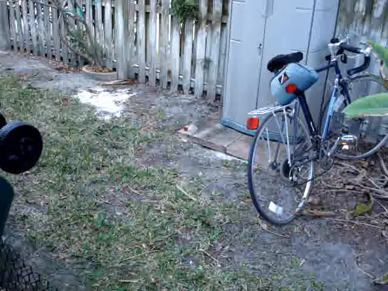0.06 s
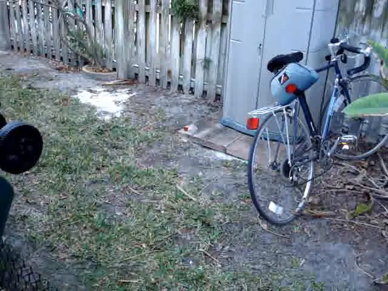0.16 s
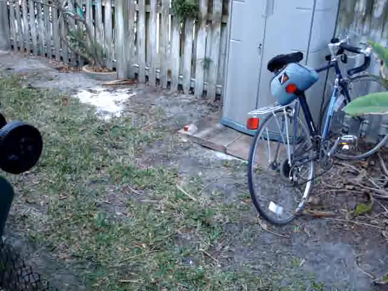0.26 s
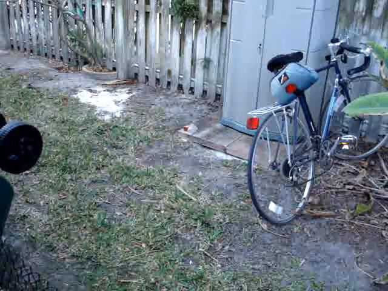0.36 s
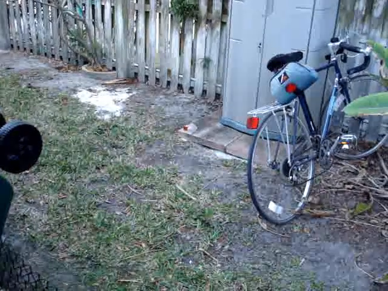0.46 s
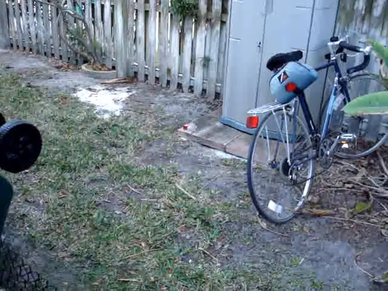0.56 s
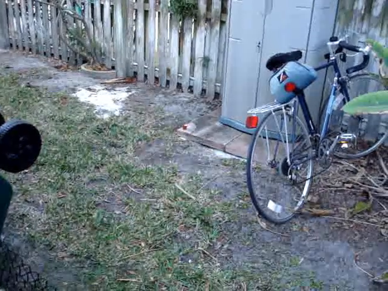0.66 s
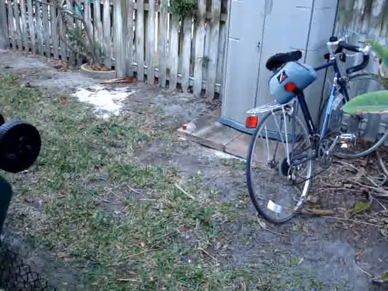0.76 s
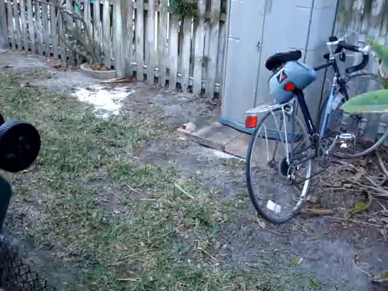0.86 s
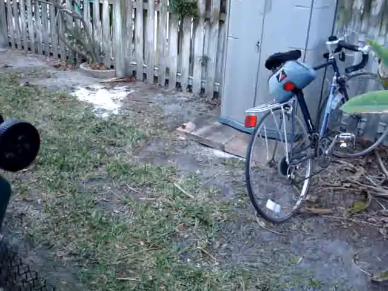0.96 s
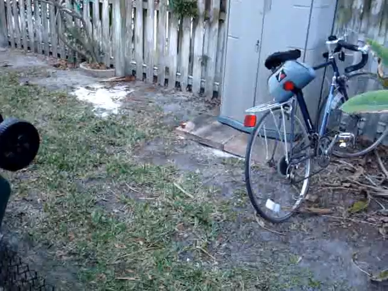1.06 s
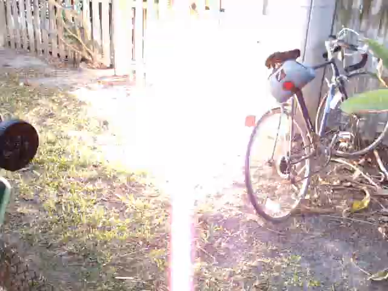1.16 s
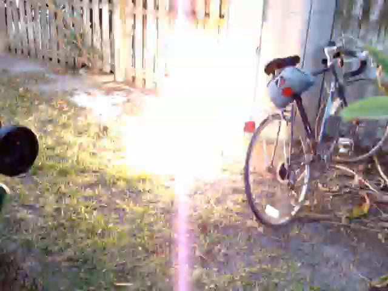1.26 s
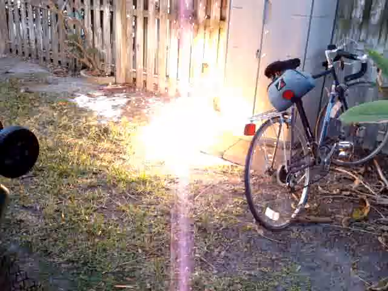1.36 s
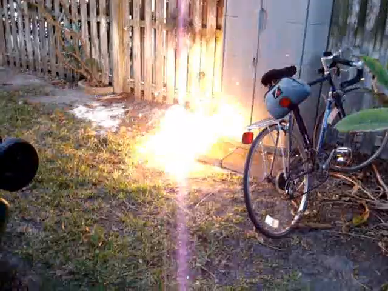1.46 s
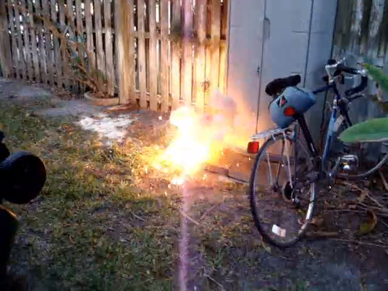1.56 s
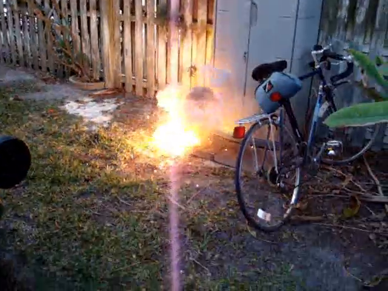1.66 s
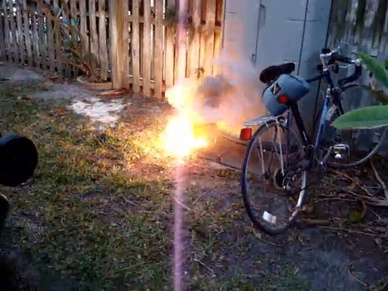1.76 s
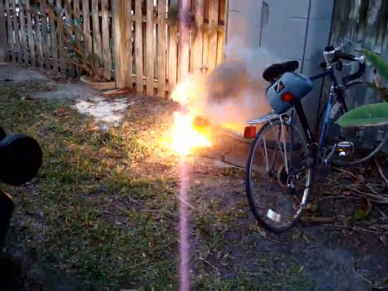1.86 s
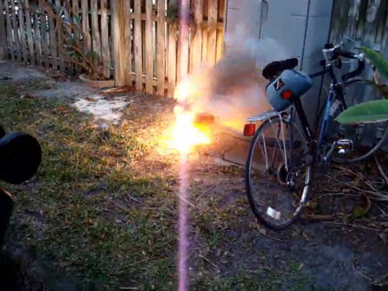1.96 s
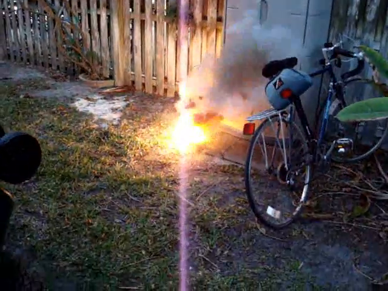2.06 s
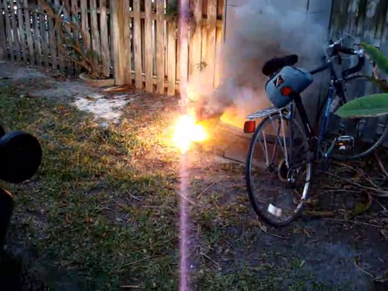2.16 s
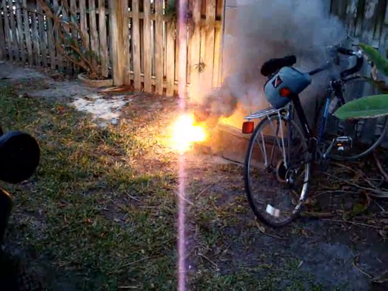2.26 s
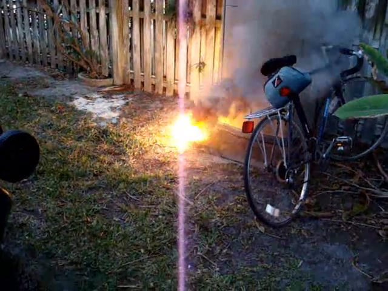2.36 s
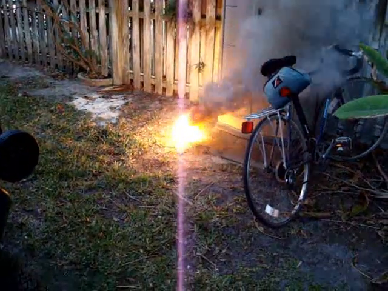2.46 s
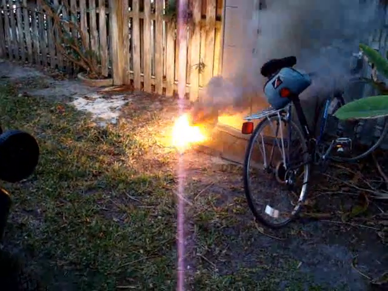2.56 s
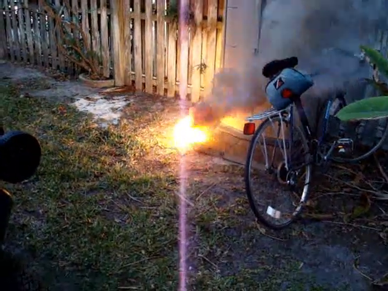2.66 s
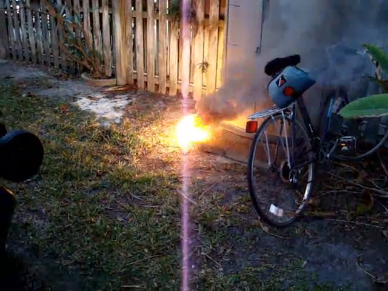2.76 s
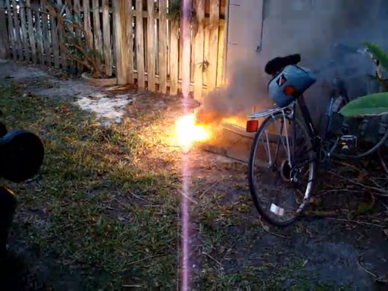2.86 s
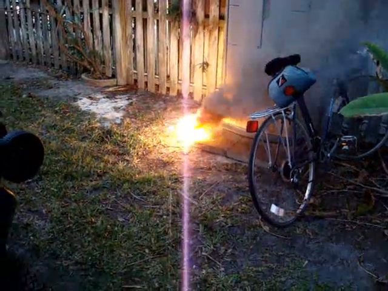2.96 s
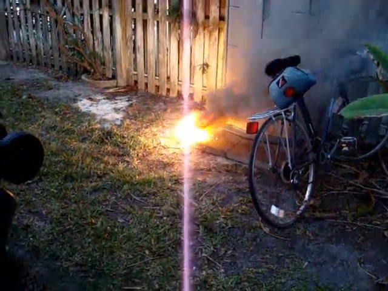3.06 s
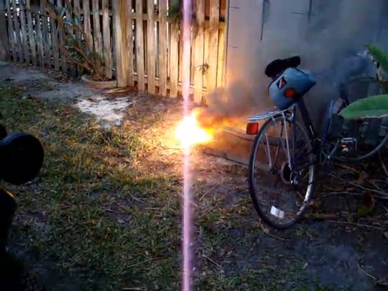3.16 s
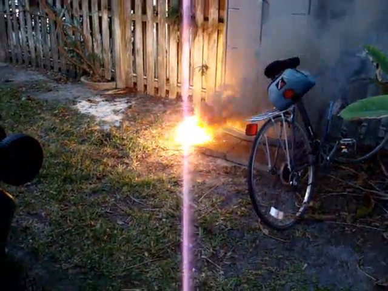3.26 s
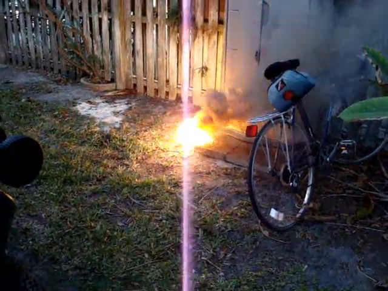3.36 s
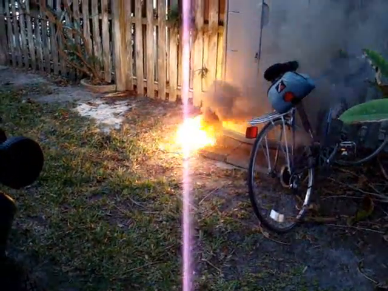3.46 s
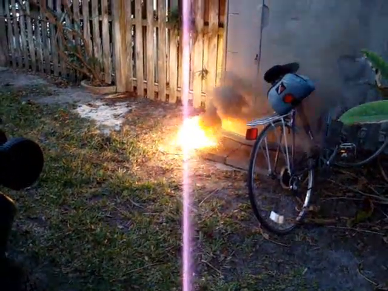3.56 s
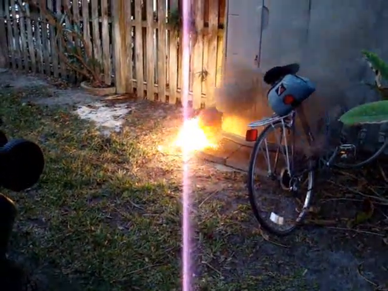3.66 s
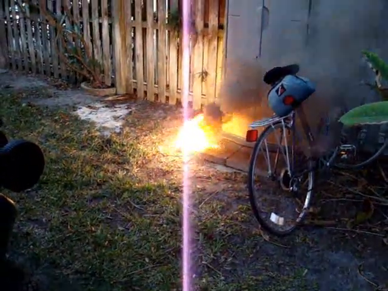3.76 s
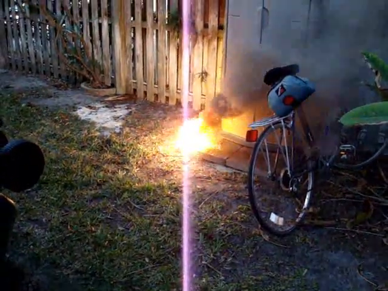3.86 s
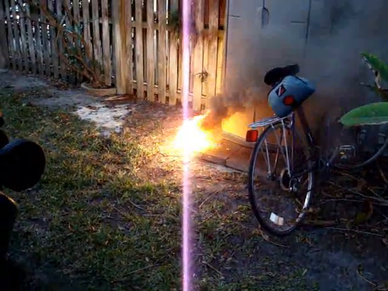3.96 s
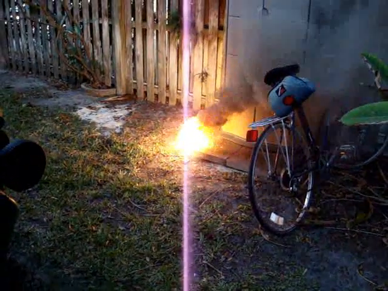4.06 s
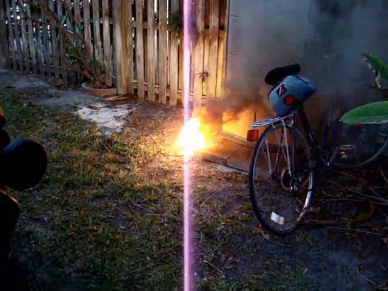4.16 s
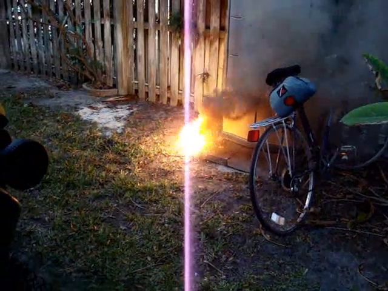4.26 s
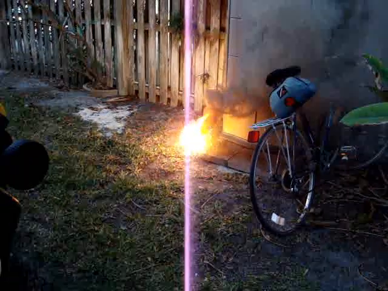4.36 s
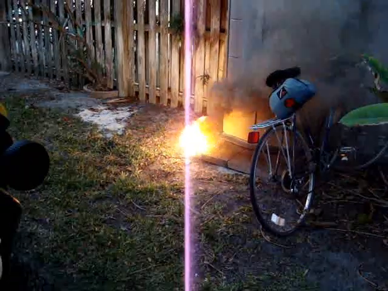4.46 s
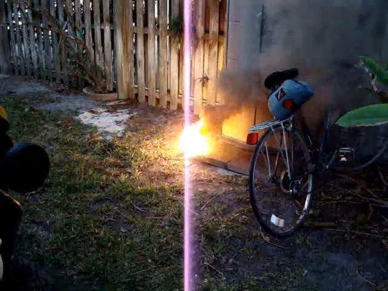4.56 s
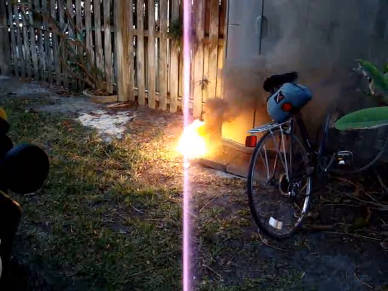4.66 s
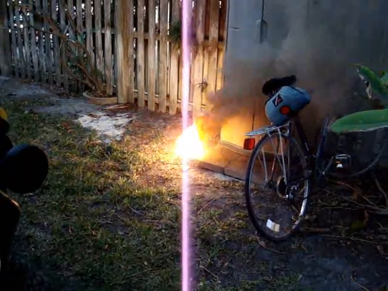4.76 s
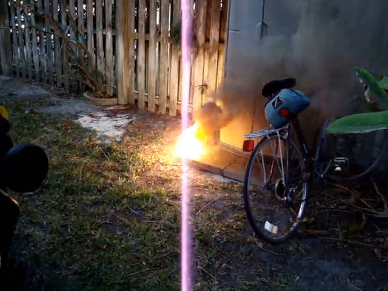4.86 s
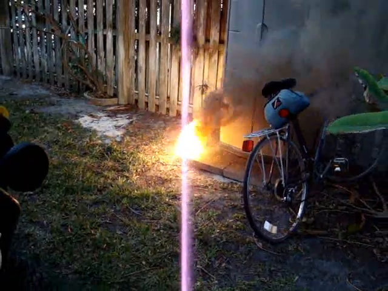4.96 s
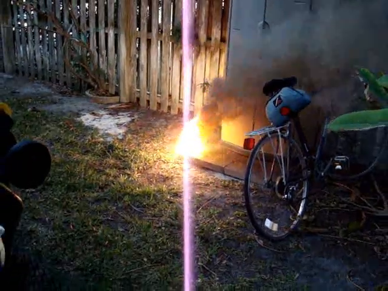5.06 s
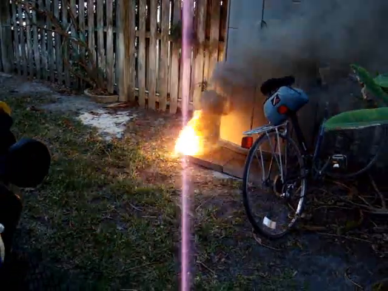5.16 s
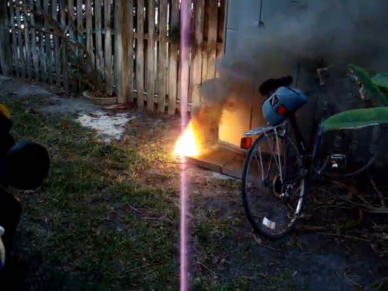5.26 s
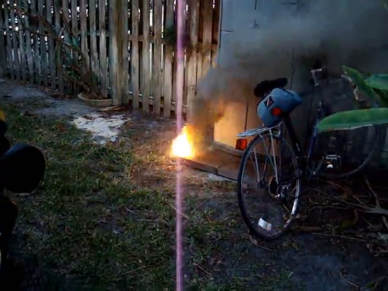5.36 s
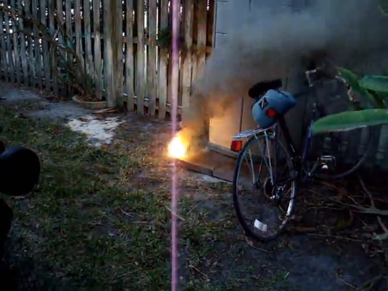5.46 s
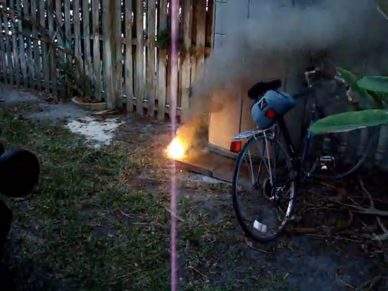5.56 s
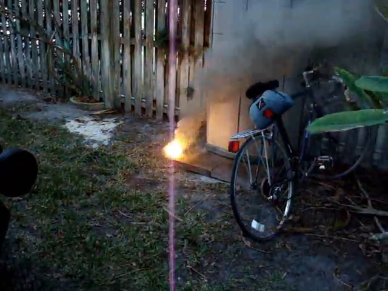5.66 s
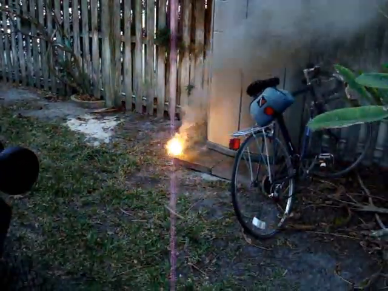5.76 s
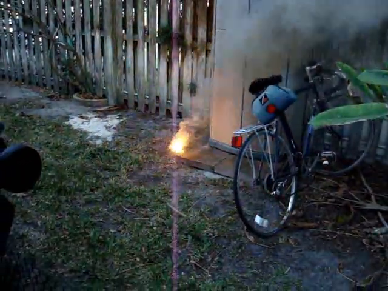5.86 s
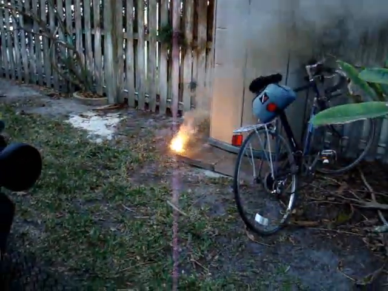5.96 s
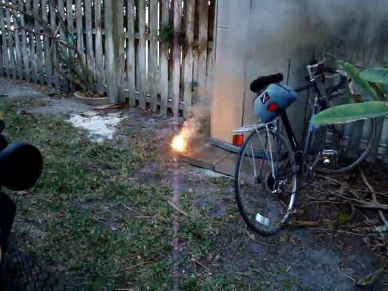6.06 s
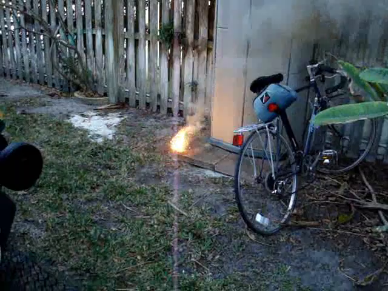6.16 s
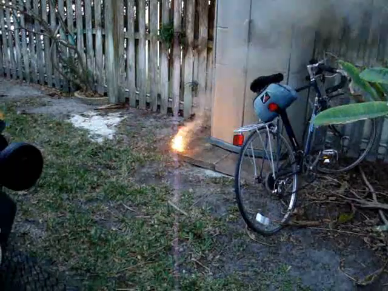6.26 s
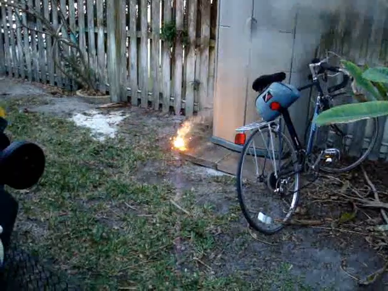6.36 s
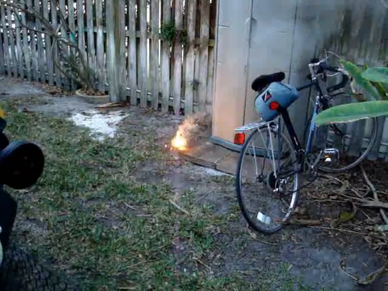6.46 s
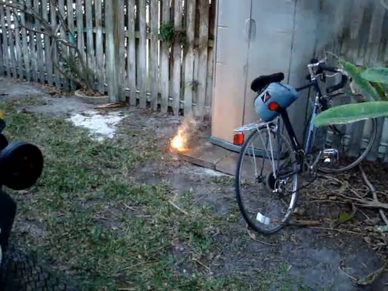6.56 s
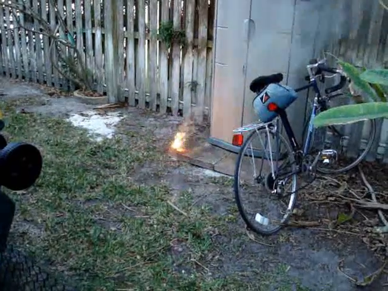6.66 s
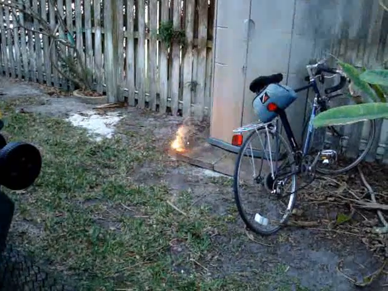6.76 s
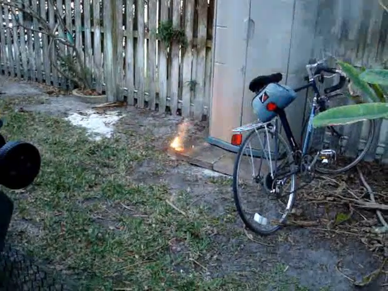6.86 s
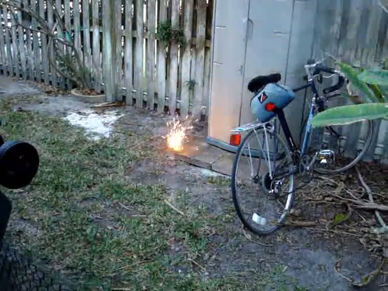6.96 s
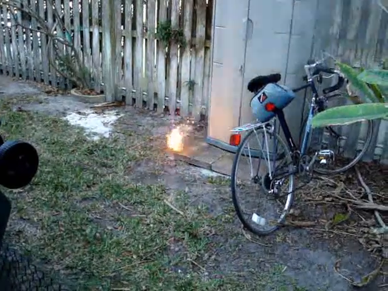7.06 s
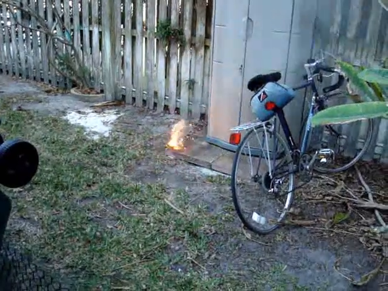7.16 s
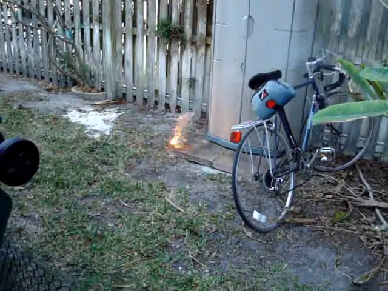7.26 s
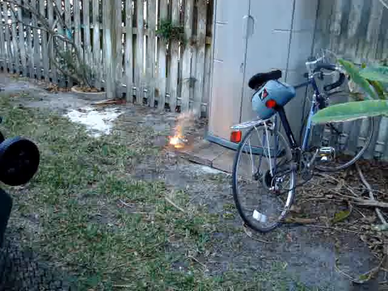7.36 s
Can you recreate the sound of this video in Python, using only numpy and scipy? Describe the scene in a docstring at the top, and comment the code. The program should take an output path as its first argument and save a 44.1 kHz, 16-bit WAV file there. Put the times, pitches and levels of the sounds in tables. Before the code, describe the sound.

For the first second there is quiet outdoor air with a distant hum, a few soft gritty rustles and a faint ringing tick at about 0.6 seconds. At 1.4 seconds a pile of thermite ignites with a sharp, loud bang, with quick slaps off a fence and a short ring from a shed wall. A bright, crackling hiss of gas and molten drops follows at once, over a soft, uneven flame rumble. Brief, thin whistles come through until 3.4 seconds, when a longer airy whistle starts, rising slightly as it fades. The hiss grows, with small snaps around 4 seconds, and is strongest from about 4.2 to 5.4 seconds. From around 5.8 it breaks into sputtering puffs and cracks, then stops at 6.9. At 7.1 seconds it flares again with a pop and loud hissing spurts, up to the end at about 7.4 seconds.

```python
"""Thermite burning in a small yard

A pile of thermite on the ground, between a shed and a wooden fence, lights with a bang. It sprays a
hissing, crackling jet of gas and molten drops that peaks, breaks up into puffs, dies for a moment and
flares again with a pop. Gas whistles through the slag and the flame rumbles. Shed, fence and ground
colour the hiss with short echoes. Behind it are outdoor air, a far hum, faint rustles and a tick."""
import sys
import numpy as np
from scipy import signal
from scipy.fft import rfft, irfft, next_fast_len
from scipy.io import wavfile

SR = 44100
rng = np.random.default_rng(int(sys.argv[2]) if len(sys.argv) > 2 else 0)


def output_pcm(signal):
    """Save a mono or channel-first signal as 16-bit PCM at the path in sys.argv[1].

    Samples are clipped to [-1, 1] before scaling.
    """
    pcm = np.clip(np.atleast_2d(signal).T, -1, 1) * 32767
    wavfile.write(sys.argv[1], SR, np.round(pcm).astype(np.int16))


N = 326781
TIME = np.arange(N) / SR
IGNITION_S, OUT_S, FLARE_S = 1.3545, 6.915, 7.1392


# Each row: frequency in Hz, relative density in dB.
SPRAY_SPECTRUM = [(100, -57), (400, -22), (720, -9.5), (1200, -9), (1700, -5.5), (2250, -3), (2700, 1),
                  (3300, 0), (4000, -2), (5500, -3.5), (7000, -8), (9850, -15), (10200, -24.5),
                  (13000, -23), (15500, -20)]
# Each row: time in seconds, gas pressure in the pile from 0 to 1.
GAS_PRESSURE = [(1.45, 0.15), (1.65, 0.5), (2.3, 0.36), (3.25, 0.54), (3.75, 0.72), (4.37, 0.38),
                (4.58, 0.82), (4.95, 0.63), (5.35, 0.85), (5.95, 0), (6.7, 0.26), (7.2, 0.02)]

def spray(gain_db=2.5, crackle_db=-3, flutter_db=0.57, zones_hz=(1300, 2300, 3500, 4900, 6000, 8000)):
    """Gas and bursting drops make one hiss; pressure brightens it, the crater thins roar and fizz."""
    pressure, sunk = curve(GAS_PRESSURE), crater()
    roar = from_db(3.4 + 0.33 * pressure - 5 * sunk)
    jet = from_db(-1.6 + 8.64 * pressure - 0.25 * sunk)
    spark_fizz = from_db(3.24 + 6.44 * pressure - 4.5 * sunk)
    source = white() + from_db(crackle_db) * crackle(base_per_s=2200, spread_db=4, clump_db=2.5)
    hiss = colour(near_echoes(fence_scatter(source)), SPRAY_SPECTRUM)
    # Four overlapping zones whose shares sum to 1.
    zones = [(roar, [1, 0, 0, 0, 0, 0]), (1, [0, 1, 1, 0, 0, 0]),
             (jet, [0, 0, 0, 1, 1, 0]), (spark_fizz, [0, 0, 0, 0, 0, 1])]
    shaped = from_db(gain_db) * sum(gain * filtered(hiss, zones_hz, shares) for gain, shares in zones)
    alight = (TIME > IGNITION_S) * np.clip((OUT_S - TIME) / 0.02, 0, 1) + (TIME > FLARE_S)
    flutter = from_db(flutter_db * drift(37))
    return alight * outflow() * flutter * (shaped + vent() + pinholes())


# Each row: time in seconds, relative level of the steady burn in dB.
BURN_LEVEL = [(1.4, -33), (1.65, -31.3), (1.82, -31), (2.3, -28), (3.2, -28.6), (3.8, -27.5), (4.25, -24.6),
              (4.6, -25.5), (5.25, -23.5), (5.55, -27), (5.9, -27), (6.1, -42), (6.85, -50)]
# Each row: start, rise and hold in seconds, relative level in dB.
POWDER_PUFFS = [(1.462, 0.029, 0.036, -33.5), (1.545, 0.029, 0.0039, -29.5), (2.863, 0.027, 0.16, -32.5),
                (3.86, .015, 0.0082, -27.5), (4.458, .01, 0.0041, -27), (4.747, 0.015, 0.0067, -27.5),
                (5.48, 0.017, 0.0017, -26), (5.644, 0.015, 0.065, -27.5), (5.835, 0.012, .015, -26),
                (5.941, .015, 0.051, -26), (6.026, .01, .01, -30), (6.095, 0.063, 0.045, -26.3),
                (6.243, 0.02, 0.029, -28.5), (6.327, 0.0089, 0.048, -25), (6.41, 0.024, 0.012, -33),
                (6.489, 0.03, 0.028, -26), (6.64, 0.015, 0.012, -25.5), (6.742, 0.035, 0.044, -28),
                (7.14, 0.0017, .022, -21.5), (7.207, 0.055, 0.054, -21.5), (7.385, 0.036, 0.06, -22)]

def outflow(puff_fall_db_per_s=180):
    """The burn builds and runs out of fuel while pockets of powder flare up; they add in power."""
    power = from_db(curve(BURN_LEVEL)) ** 2
    for start, rise, hold, db in POWDER_PUFFS:
        power += (from_db(db) * swell(start, rise, hold, puff_fall_db_per_s)) ** 2
    return np.sqrt(power)


def crater(start_s=3.45, length_s=2.2):
    """How far the pile has sunk into its crater, 0 to 1."""
    return np.clip((TIME - start_s) / length_s, 0, 1)


# Each row: start in seconds, pulse level before filtering in dB, pulse length in seconds,
# scatter level in dB, scatter t60 in seconds.
BLASTS_AND_SLAPS = [(1.3532, -5.5, .001, -9, 0.16), (1.361, -23, 0.00063, -19, 0.079),
                    (1.391, -2.5, 0.0011, -16.5, 0.18), (1.411, -8, 0.00115, -19, 0.066),
                    (7.139, -10, 0.0011, -20.5, 0.045)]
# Each row: frequency in Hz, relative density in dB.
BANG_SPECTRUM = [(24, -50), (90, -27), (230, -11), (340, -8), (500, 2), (760, 1), (1200, 2), (1700, -3.5),
                 (2700, -11.5), (5000, -23), (9650, -27), (12100, -31), (15000, -31)]

def blasts(low_hz=190, high_hz=5500):
    """Each blast or slap off a wall is an N-shaped pressure pulse, then dense scatter from the yard."""
    pulses, scatter = np.zeros(N), np.zeros(N)
    for start, pulse_db, length, scatter_db, t60 in BLASTS_AND_SLAPS:
        phase = (TIME - start) / length
        pulses += from_db(pulse_db) * (2 * phase - 1) * ((phase >= 0) & (phase < 1))
        scatter += from_db(scatter_db) * decay(start + length, t60)
    return band(pulses, low_hz, high_hz) + scatter * colour(white(), BANG_SPECTRUM)


# Each row: start in seconds, relative level in dB.
DROP_SNAPS = [(1.3937, -10), (4.032, -23), (4.104, -16), (4.193, -15), (5.845, -17), (5.96, -15),
              (6.271, -21), (6.341, -15), (6.645, -26), (7.1396, -12), (7.21, -13.5), (7.254, -13)]

def snaps(t60_s=0.04, gain_db=-7):
    """Larger drops burst with a short crack in the colour of the spray."""
    envelope = sum(from_db(db + gain_db) * decay(start, t60_s) for start, db in DROP_SNAPS)
    return envelope * near_echoes(colour(white(), SPRAY_SPECTRUM))


def vent(opens_s=3.38, start_hz=4960, climb_hz_per_s=410, gain_db=3.5):
    """Gas through the open vent makes a long, airy, rising whistle."""
    envelope = from_db(gain_db) * swell(opens_s, rise_s=0.26, hold_s=0, fall_db_per_s=8.5)
    return envelope * whistle(start_hz + climb_hz_per_s * (TIME - opens_s), half_width_hz=620)


# Each row: peak time in seconds, pitch in Hz, relative level in dB.
PINHOLE_WHISTLES = [(1.7, 7400, -6), (2.0, 7700, -3.5), (2.33, 2840, -12.5), (2.93, 7360, -4),
                    (3.03, 2920, -13), (3.299, 4500, -9), (3.4, 7600, -4.5)]

def pinholes(swell_s=0.14, half_width_ratio=0.049):
    """Gas whistles briefly through pinholes in the slag."""
    whistles = np.zeros(N)
    offset_s = np.arange(-SR // 2, SR // 2) / SR
    for peak_s, hz, db in PINHOLE_WHISTLES:
        first = int((peak_s + offset_s[0]) * SR)
        envelope = from_db(db) * np.exp(-(offset_s / swell_s) ** 2)
        tone = whistle(np.full(len(offset_s), hz), half_width_ratio * hz)
        whistles[first:first + len(tone)] += envelope * tone
    return whistles


# Each row: time in seconds, level in dB.
FLAME_LEVEL = [(1.55, -50.5), (1.72, -61), (2.4, -45.5), (2.6, -52.5), (5.35, -55), (5.75, -64.5),
               (7.41, -78)]

def flame(flutter_db=2):
    """The fireball rumbles unevenly while it burns."""
    spectrum_hz_db = ((25, -5), (70, -5), (180, 0), (330, -5), (600, -16), (2000, -45))
    alight = (TIME > IGNITION_S) * (TIME < OUT_S) + (TIME > FLARE_S)
    level_db = curve(FLAME_LEVEL) + flutter_db * drift(13)
    return alight * from_db(level_db) * colour(white(), spectrum_hz_db)


# Each row: frequency in Hz, level in dB, t60 in seconds.
SHED_MODES = [(415, -24, 0.33), (523, -27, 0.44), (700, -24, 0.44), (768, -18, 0.33), (926, -34, .19),
              (1118, -30, 0.13), (1227, -17.5, 0.23)]

def shed_ring():
    """The shed wall rings after the bang."""
    return struck(IGNITION_S, SHED_MODES)


# Each row: delay in ms, relative gain over the fresh pile, relative gain over the crater.
ECHO_TAPS = [(0.439, 0.023, -0.13), (1.234, -0.16, 0.046), (1.37, 0.082, 0), (1.48, -0.038, 0.1),
             (1.633, -0.032, -0.11), (1.883, -0.063, 0.22), (2.089, -0.082, 0.08), (2.208, -0.12, -0.084),
             (3.439, -0.079, -0.072), (3.539, 0.0073, -0.15), (5.106, 0.13, 0.018), (6.761, -0.053, -0.028)]

def near_echoes(x, cutoff_hz=6000, gain=1.44):
    """Dull reflections off ground and shed comb the sound; their pattern shifts as the pile sinks."""
    sunk = crater()
    dull = gain * signal.lfilter(*signal.butter(1, cutoff_hz, fs=SR), x)
    echoes = np.zeros(N)
    for delay_ms, pile_gain, crater_gain in ECHO_TAPS:
        delayed = np.interp(TIME - delay_ms / 1000, TIME, dull)
        echoes += (pile_gain + (crater_gain - pile_gain) * sunk) * delayed
    return x + echoes


def fence_scatter(x, wet_db=-7.5, t60_s=0.1):
    """The slats of the fence add a short, sparse tail."""
    age = TIME[:SR // 2]
    reflections = rng.standard_normal(len(age)) * (rng.random(len(age)) < .03)
    tail = reflections * (age > .005) * from_db(-60 * age / t60_s)
    return x + from_db(wet_db) * signal.fftconvolve(x, tail / np.linalg.norm(tail))[:N]


# Each row: frequency in Hz, level in dB, t60 in seconds.
TICK_MODES = [(1810, -39, 0.13), (2270, -37, .08), (2560, -42, .05), (2830, -43, .05)]

def tick(start_s=.559):
    """One faint, ringing tick before the pile catches."""
    return struck(start_s, TICK_MODES)


# Each row: start in seconds, level in dB, t60 in seconds.
SCUFFS = [(.083, -51, .2), (.281, -47, .25), (.869, -48, .1), (.911, -42, .1), (.934, -48, .1),
          (1.153, -48, .12), (1.207, -48, .1)]

def rustles(low_hz=1600, high_hz=3800):
    """Soft, gritty scuffs close by before the pile catches."""
    grit = rms_one(band(crackle(base_per_s=2500, spread_db=4, clump_db=7), low_hz, high_hz))
    return grit * sum(from_db(db) * decay(start, t60) for start, db, t60 in SCUFFS)


# Each row: time in seconds, air level in dB.
BACKGROUND_LEVEL = [(0, -41), (1.35, -41), (1.5, -50), (5.8, -47), (6.9, -43.5), (7.41, -42)]
# Each row: frequency in Hz, relative density in dB.
AIR_SPECTRUM = [(25, -10), (70, -14), (115, -3.5), (180, -3.5), (300, 0), (450, -1), (700, 1), (1200, -3),
                (2800, -8.5), (4500, -16), (9800, -26), (12000, -34), (15500, -27)]
# Each row: frequency in Hz, relative level in dB.
HUM_TONES = [(118.4, -56), (210, -55.5), (290.7, -52), (360.7, -52.5)]

def background(hum_gain_db=-2.5, waver_depth=0.37, waver_per_s=5):
    """Outdoor air and the wavering far hum of the neighbourhood, on one level curve."""
    level_db = curve(BACKGROUND_LEVEL)
    hum = np.zeros(N)
    for hz, db in HUM_TONES:
        amplitude = np.sqrt(2) * from_db(db + hum_gain_db) * (1 + waver_depth * drift(waver_per_s))
        hum += amplitude * np.sin(2 * np.pi * hz * TIME + drift(waver_per_s))
    air = from_db(level_db) * colour(white(), AIR_SPECTRUM)
    return air + from_db(level_db - level_db[0]) * hum


def crackle(base_per_s, spread_db, clump_db):
    """Tiny clicks in clumps, some much larger than the rest; rms 1."""
    fires = rng.random(N) < base_per_s * from_db(clump_db * drift(25)) / SR
    sizes = from_db(spread_db * np.minimum(rng.exponential(1, N), 3.2))
    return rms_one(fires * sizes * rng.choice([-1, 1], N))


def whistle(pitch_hz, half_width_hz):
    """Narrow noise along a pitch track; rms 1."""
    noise = rng.standard_normal(len(pitch_hz)) + 1j * rng.standard_normal(len(pitch_hz))
    turbulence = signal.lfilter(*signal.butter(2, half_width_hz, fs=SR), noise)
    carrier = np.exp(2j * np.pi * np.cumsum(pitch_hz) / SR)
    return rms_one(np.real(turbulence * carrier))


def struck(start_s, modes):
    """Modes set ringing by one blow."""
    return sum(from_db(db) * decay(start_s, t60) * np.sin(2 * np.pi * hz * (TIME - start_s))
               for hz, db, t60 in modes)


def swell(start_s, rise_s, hold_s, fall_db_per_s):
    """Envelope that rises, holds and dies away."""
    age = TIME - start_s
    return np.clip(age / rise_s, 0, 1) * from_db(-fall_db_per_s * np.clip(age - rise_s - hold_s, 0, 4))


def decay(start_s, t60_s):
    """Envelope that jumps to 1 and dies away."""
    return (TIME >= start_s) * from_db(-60 * np.clip((TIME - start_s) / t60_s, 0, 5))


def drift(per_s):
    """Slow random curve changing about per_s times a second; rms 1."""
    step, settle = 20, 2000
    pole = np.exp(-2 * np.pi * per_s * step / SR)
    noise = rng.standard_normal(N // step + settle + 2)
    slow = signal.lfilter([1], [1, -2 * pole, pole * pole], noise)[settle:]
    return np.interp(np.arange(N) / step, np.arange(len(slow)), rms_one(slow))


def curve(rows):
    """Time and value rows, interpolated to every sample."""
    return np.interp(TIME, *np.transpose(rows))


def colour(x, spectrum):
    """Shape by rows of Hz and dB; rms 1."""
    hz, level_db = np.transpose(spectrum)
    return rms_one(filtered(x, hz, from_db(level_db)))


def filtered(x, hz, gains):
    """Filter with gains interpolated over log frequency."""
    size = next_fast_len(N + SR // 10)
    bins_hz = np.maximum(np.fft.rfftfreq(size, 1 / SR), 1)
    response = np.interp(np.log(bins_hz), np.log(hz), gains)
    return irfft(rfft(x, size) * response, size)[:N]


def band(x, low_hz, high_hz):
    """Gentle band-pass."""
    return signal.sosfilt(signal.butter(2, [low_hz, high_hz], "band", fs=SR, output="sos"), x + 1e-18)


def white():
    """Fresh white noise."""
    return rng.standard_normal(N)


def rms_one(x):
    """Scale to rms 1."""
    return x / np.sqrt(np.mean(x ** 2) + 1e-20)


def from_db(db):
    """Decibels to gain."""
    return 10 ** (np.asarray(db) / 20)


def scene():
    """Everything reaches one microphone; both channels are alike."""
    thermite = spray() + snaps() + blasts() + flame()
    mono = thermite + shed_ring() + background() + tick() + rustles()
    return np.array([mono, mono])


def record(dry, ceiling=.95, cutoff_hz=15800):
    """The bang overloads the input; a steep low-pass cuts the top."""
    lowpass = signal.ellip(10, .1, 75, cutoff_hz, fs=SR, output="sos")
    return signal.sosfilt(lowpass, np.clip(dry, -ceiling, ceiling))


dry = scene()
out = record(dry)
output_pcm(out)
```